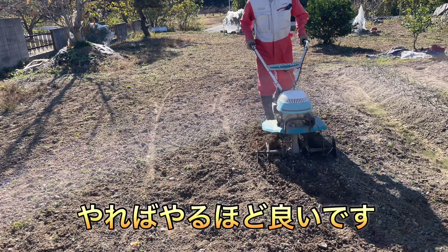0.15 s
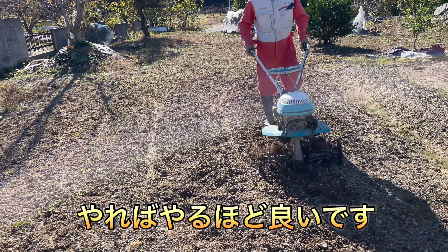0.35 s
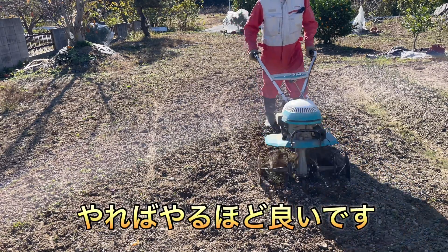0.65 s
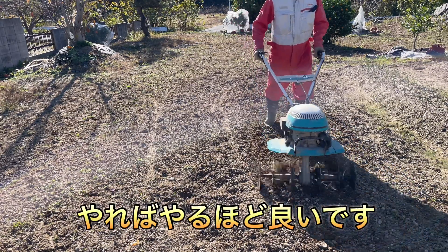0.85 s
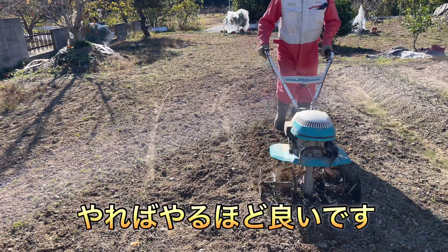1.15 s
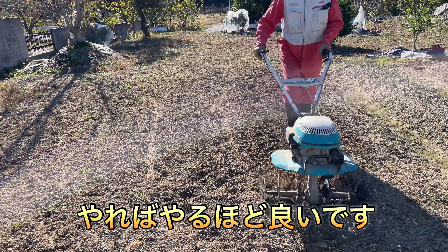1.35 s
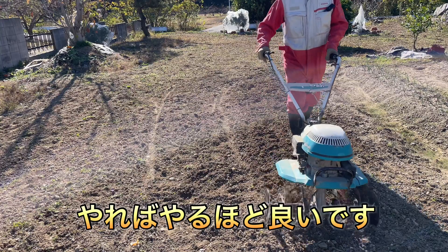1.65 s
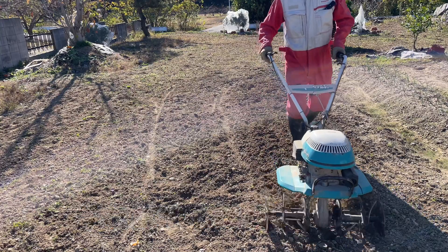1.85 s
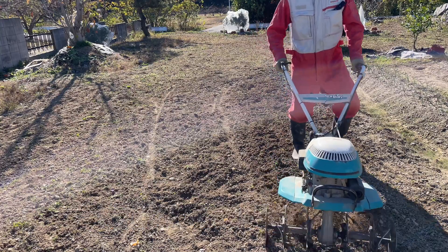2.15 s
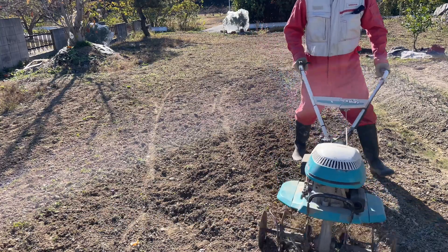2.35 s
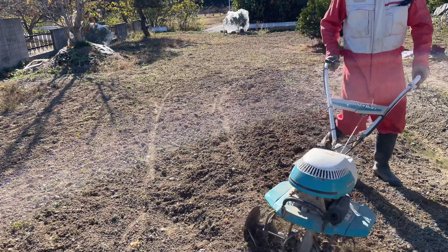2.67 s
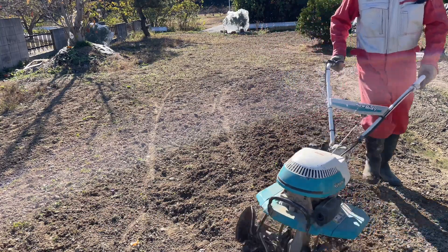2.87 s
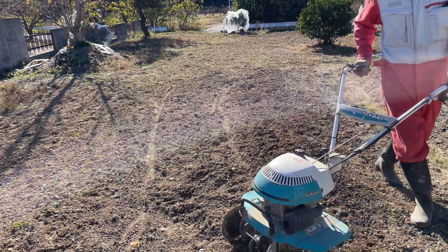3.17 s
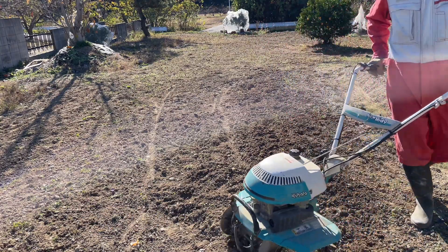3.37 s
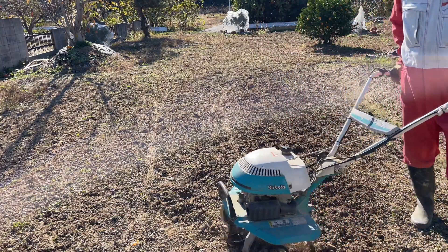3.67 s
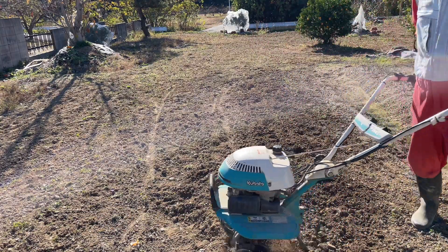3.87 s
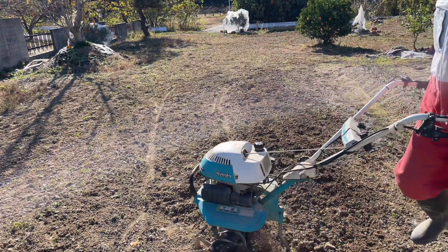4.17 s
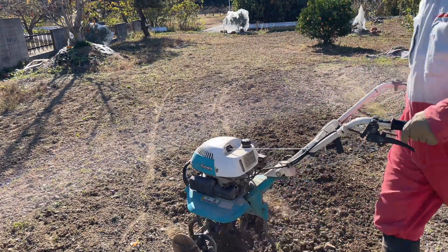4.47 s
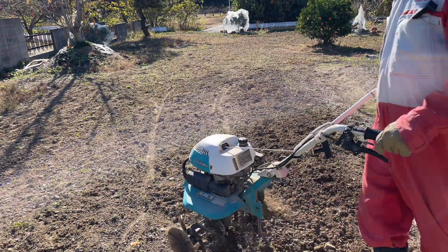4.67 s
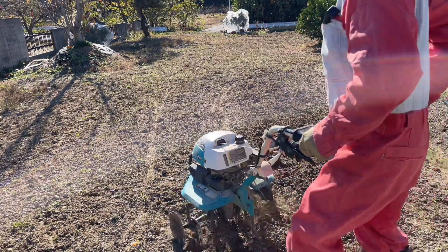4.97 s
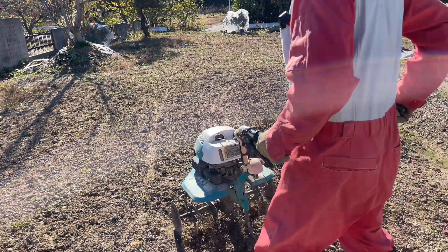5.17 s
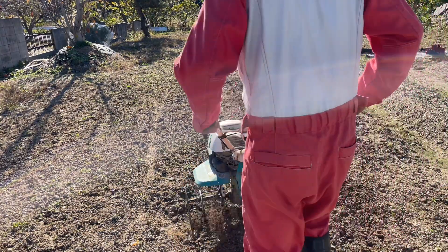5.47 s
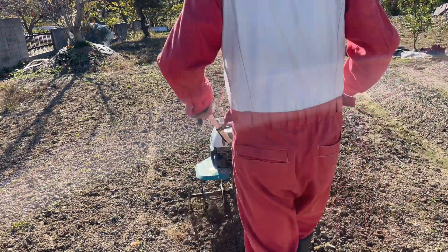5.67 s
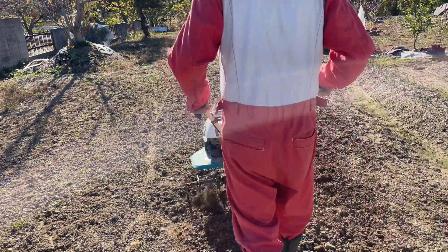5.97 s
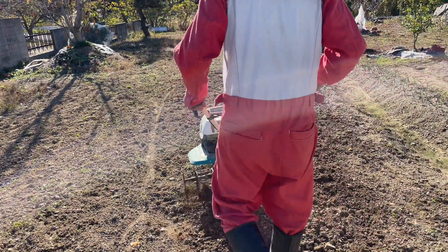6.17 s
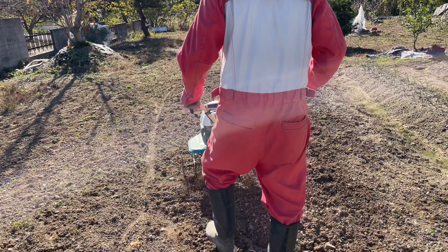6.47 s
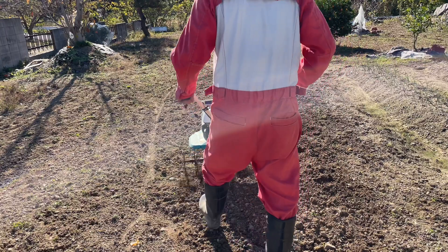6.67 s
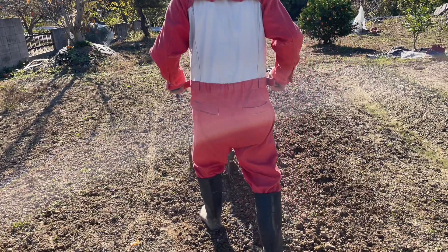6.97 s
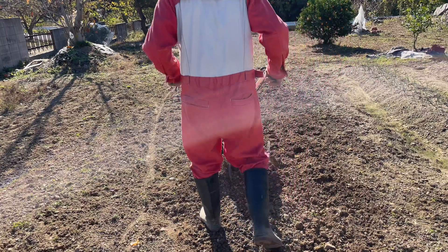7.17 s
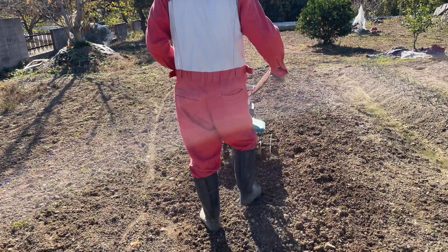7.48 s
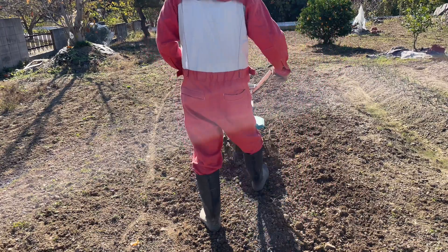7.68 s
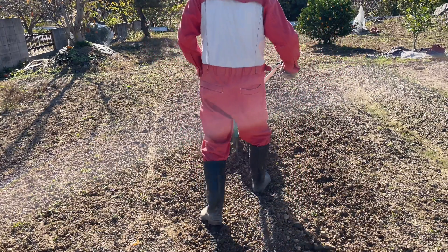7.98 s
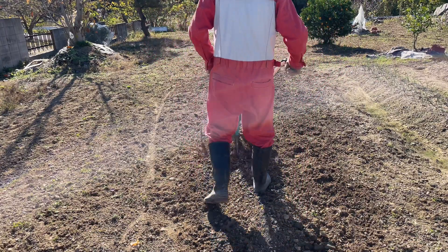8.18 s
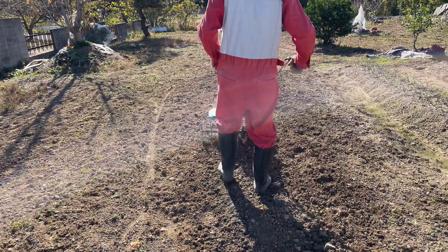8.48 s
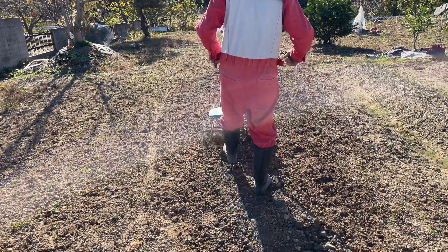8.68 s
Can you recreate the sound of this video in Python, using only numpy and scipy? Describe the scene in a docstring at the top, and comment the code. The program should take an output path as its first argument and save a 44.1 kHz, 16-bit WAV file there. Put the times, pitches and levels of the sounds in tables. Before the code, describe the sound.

Steady low putter of a small four-stroke tiller working dry soil close by, with metallic clatter, fan hiss and occasional stone clinks.

```python
"""A small four-stroke cultivator chugs steadily, tilling dry soil in an open field, under 3 m away.
It comes near, turns side on and moves off, its operator stepping between it and the two-port microphone.
Each cycle gives a muffled exhaust thump built of overtones, a cracking muffler, and a combustion knock;
noise driven by piston and valve blows rattles the covers and fins, and the cooling fan hisses.
Random grains make crumbling earth; narrow noise bands swell, stones clink, tines scrape harder ground."""
import sys
import numpy as np
from scipy import signal
from scipy.fft import rfft, irfft, next_fast_len
from scipy.io import wavfile

SR = 44100
rng = np.random.default_rng(int(sys.argv[2]) if len(sys.argv) > 2 else 0)


def inscribe(sig):
    """Save sig as 16-bit PCM at rate SR to the path in sys.argv[1].

    A 1-D sig is mono; a 2-D sig holds one channel per row.
    Samples are clipped to [-1, 1] before scaling.
    """
    pcm = np.round(np.clip(np.atleast_2d(sig).T, -1, 1) * 32767)
    wavfile.write(sys.argv[1], SR, pcm.astype(np.int16))


N = 389403
TIME = np.arange(N) / SR


def from_db(db):
    """Decibels to amplitude gain."""
    return np.exp(np.asarray(db) * (np.log(10) / 20))


def rms_one(x):
    """Scale to unit power."""
    return x / np.sqrt(np.mean(x ** 2) + 1e-20)


def in_time(rows):
    """Each column of a curve, interpolated at every sample."""
    seconds, *columns = np.transpose(rows)
    return [np.interp(TIME, seconds, column) for column in columns]


def at_hz(points, hz):
    """Read a spectrum on a log-frequency axis."""
    f, value = np.transpose(points)
    return np.interp(np.log(hz + 1), np.log(f), value)


def filtered(x, response):
    """Apply a response given as a function of frequency in Hz."""
    size = next_fast_len(N + 4096)
    hz = np.arange(size // 2 + 1) * SR / size
    return irfft(rfft(x, size) * response(hz), size)[..., :N]


def highpassed(x, corner_hz, order):
    """Remove the bass without shifting phase; half amplitude at the corner."""
    return filtered(x, lambda hz: hz ** order / (hz ** order + corner_hz ** order))


def colour(x, spectrum):
    """Shape a sound by a dB spectrum."""
    return filtered(x, lambda hz: from_db(at_hz(spectrum, hz)))


def drift(rate_hz):
    """Smooth chance with unit power, drawn at every 100th sample and slower than about rate_hz."""
    steps = np.arange(0, N + 100, 100)
    hz = np.arange(len(steps) // 2 + 1) * SR / steps[-1]
    spectrum = rfft(rng.standard_normal(len(steps))) / (1 + (hz / rate_hz) ** 4)
    slow = irfft(spectrum, len(steps))
    return np.interp(np.arange(N), steps, rms_one(slow))


def resonate(x, modes, flip=-1):
    """Parallel resonances; each is scaled by one more factor of flip, so -1 alternates their signs."""
    out = 0
    for k, (hz, width_hz, db) in enumerate(modes):
        r = np.exp(-np.pi * width_hz / SR)
        top = flip ** k * from_db(db) * (1 - r * r) / 2
        poles = [1, -2 * r * np.cos(2 * np.pi * hz / SR), r * r]
        out = out + signal.lfilter([top, 0, -top], poles, x + 1e-18)
    return out


def diffuse(x, decay_ms):
    """Smear a sound over a short random tail of decaying noise with unit energy."""
    ms = np.arange(SR // 5) * 1000 / SR
    tail = rng.standard_normal(len(ms)) * np.exp(-ms / decay_ms)
    return signal.fftconvolve(x, tail / np.linalg.norm(tail))[:N]


def once_a_cycle(cycle, at, spread_db, jitter_ms):
    """A click each time the engine passes one point of its cycle, never quite alike."""
    where = np.flatnonzero(np.diff(np.floor(cycle - at)) > 0)
    chance = rng.standard_normal((N // 1000, 2))[:len(where)]
    shift = (chance[:, 0] * jitter_ms * SR / 1000).astype(int)
    clicks = np.zeros(N)
    clicks[np.clip(where + shift, 0, N - 1)] = from_db(spread_db * chance[:, 1])
    return clicks


def grains(per_s, spread_db):
    """Random tiny contacts of very uneven size and either sign, at unit power."""
    sizes = from_db(spread_db * np.minimum(rng.exponential(1, N), 4))
    happens = rng.random(N) < per_s / SR
    return rms_one(happens * sizes * rng.choice([-1, 1], N))


def swell(middle_s, half_s, db):
    """A smooth rise and fall of gain."""
    near = abs(TIME - middle_s) < 4 * half_s
    gain = np.zeros(N)
    gain[near] = from_db(db) * np.exp(-((TIME[near] - middle_s) / half_s) ** 2)
    return gain


def facing(views, levels_db):
    """Gain of a part that radiates unevenly, as the machine turns from one view to the next."""
    return from_db(sum(share * db for share, db in zip(views, levels_db)))


# exhaust note from four sides, relative levels: (multiple of the firing rate, level [dB])
FRONT_NOTE = [(2, -5.5), (3, -8), (4, -2), (5, 0.5), (6, 1.5), (7, -5.5), (8, -10.5), (9, -11), (10, -19.5),
              (12, -24.5), (16, -21)]
SIDE_NOTE = [(2, -6), (3, -8), (4, -2.5), (5, 1.5), (6, 1.5), (7, -7), (8, -15), (9, -18.5), (10, -35),
             (11, -33), (12, -17), (13, -13.5)]
TURNING_NOTE = [(1, -40), (2, -3), (3, -8), (4, 3), (5, 2.5), (6, -1), (7, -6.5), (8, -6), (9, -14),
                (10, -20.5), (11, -22), (12, -27.5), (14, -13)]
BACK_NOTE = [(1, -37), (2, -4.5), (3, -9), (4, -0.5), (5, 0), (6, 3.5), (7, -11.5), (8, -11), (9, -11),
             (10, -19.5), (11, -15), (12, -17.5), (15, -17), (16, -19.5)]
# uneven gas flow around the note, relative spectrum: (frequency [Hz], level per Hz [dB])
GAS_FLOW = [(20, -1), (38, -15), (60, 3.5), (160, 1.5), (240, 3.5), (320, -12), (450, -10.5), (900, -33)]
# source level, before distance: (front [dB], side [dB], turning [dB], behind the operator [dB])
EXHAUST_LEVEL = [-6, -11, -14.5, -10.5]
CRANK_LEAD_RAD = .75


def exhaust(cycle, views):
    """One rounded thump per firing, its overtones set by the side that faces the microphone."""
    angle = (2 * np.pi * ((cycle + .002 * drift(8)) % 1)).astype("float32")
    thumps = 0
    for share, note in zip(views, (FRONT_NOTE, SIDE_NOTE, TURNING_NOTE, BACK_NOTE)):
        overtones = 0
        for multiple, db in note:
            k = round(multiple)
            # the crankshaft, turning twice a cycle, shakes the machine a little ahead of the thump
            phase = (k == 2) * CRANK_LEAD_RAD
            # above the muffler's main resonance the overtones swing a third of a turn out of step
            phase += (multiple > 7.5) * 2 * np.pi / 3
            overtones = overtones + float(from_db(db)) * np.cos(k * angle + phase)
        thumps = thumps + share * rms_one(overtones)
    flow = rms_one(colour(rng.standard_normal(N), GAS_FLOW))
    return facing(views, EXHAUST_LEVEL) * (from_db(0.25 * drift(6.6)) * thumps + from_db(-20) * flow)


# piston and valve blows: (delay after the thump [cycles], relative strength, decay [ms])
CYCLE_BLOWS = [(-.43, .35, 2.5), (-.265, 0.62, 2.4), (.0, 0.28, 3.2), (0.249, 0.76, 1.8)]


def shaking(cycle):
    """Piston and valve blows each set off a short, dying burst of force that drives the clatter."""
    force = 0
    for at, strength, decay_ms in CYCLE_BLOWS:
        clicks = once_a_cycle(cycle, at=at, spread_db=3.5, jitter_ms=0.27)
        decay = np.exp(-1000 / (decay_ms * SR))
        force = force + strength * signal.lfilter([1], [1, -decay], clicks + 1e-18)
    return force


def loose_parts(shake, modes, steady, swell_db):
    """Each part rattles by itself, harder after every blow, and flares and fades at random."""
    out = 0
    force = steady + shake
    for mode in modes:
        noise = rng.standard_normal(N) * force
        out = out + resonate(noise * from_db(swell_db * drift(14)), [mode])
    return rms_one(out)


def rattle(shake, behind, front_modes, back_modes, steady, swell_db):
    """As the machine turns, the parts at its back take over from those at its front."""
    front = loose_parts(shake, front_modes, steady, swell_db)
    back = loose_parts(shake, back_modes, steady, swell_db)
    return np.sqrt(np.clip(1 - behind, 0, 1)) * front + np.sqrt(behind) * back


# engine cover and tine guard, front then back: (frequency [Hz], width [Hz], relative level [dB])
COVER_FRONT = [(456, 110, -10.5), (570, 84, -7), (765, 204, -7), (939, 68, -13.5), (1256, 64, -3),
               (1318, 44, -0.5), (1424, 79, -6.5)]
COVER_BACK = [(351, 210, -8), (663, 126, -4), (800, 100, -5.5), (971, 74, -2), (1318, 53, 1.5),
              (1435, 67, -1)]
# source level, before distance: (front [dB], side [dB], turning [dB], behind the operator [dB])
COVER_LEVEL = [-17, -19.5, -22, -21.5]


def cover_rattle(shake, views):
    """Engine cover and tine guard ring on their modes as the blows shake them."""
    behind = views[2] + views[3]
    parts = rattle(shake, behind, COVER_FRONT, COVER_BACK, steady=0.95, swell_db=1.25)
    return facing(views, COVER_LEVEL) * parts


# cooling fins and linkage, front then back: (frequency [Hz], width [Hz], relative level [dB])
FINS_FRONT = [(1970, 113, 4), (2123, 63, 4.5), (2280, 67, 3.5), (2600, 260, -4.5), (3180, 470, -7),
              (5380, 480, -11), (6270, 1100, -12.5)]
FINS_BACK = [(1997, 71, 4.5), (2193, 106, 0.5), (2560, 140, -0.5), (3050, 87, -1), (3266, 200, -1.5),
             (6010, 250, -6)]
# source level, before distance: (front [dB], side [dB], turning [dB], behind the operator [dB])
FINS_LEVEL = [-21.5, -21.5, -23.5, -27]


def fins_rattle(shake, views):
    """Cooling fins and linkage rattle on higher modes than the cover."""
    behind = views[2] + views[3]
    parts = rattle(shake, behind, FINS_FRONT, FINS_BACK, steady=0.87, swell_db=2.0)
    return facing(views, FINS_LEVEL) * parts


# fan and gear hiss, relative spectrum: (frequency [Hz], level per Hz [dB])
HISS_SPECTRUM = [(250, -20), (480, -3), (1000, -3.5), (1700, -2), (2400, -1), (3600, -3.5), (5000, -5.5),
                 (7500, -6), (9500, -7), (12000, -12.5), (14000, -14.5), (16000, -32)]


def fan(shake, views):
    """Fan and gear hiss, stronger after each blow; a short random tail gives it a finely uneven colour."""
    hiss = rms_one(colour(rng.standard_normal(N) * (0.52 + shake), HISS_SPECTRUM))
    hiss = rms_one(hiss + 0.39 * diffuse(hiss, decay_ms=10.4))
    # from the front the cowl takes the edge off the hiss
    cowl = .5 * views[0] * resonate(hiss, [(6300, 1900, 0)])
    return from_db(0.87 * drift(15.0)) * (hiss - cowl)


# tine steel, rung by crumbs and by stones: (frequency [Hz], width [Hz], relative level [dB])
TINE_STEEL = [(3240, 360, 21), (4870, 560, 11), (7140, 700, 9), (10500, 6800, 4), (14500, 2500, -4)]


def crumbling():
    """Crumbs of earth patter in clumps and ring the steel: random grains whose density drifts."""
    crumbs = grains(per_s=1300 * from_db(3 * drift(6.4)), spread_db=5.0)
    return rms_one(resonate(crumbs, TINE_STEEL))


# hiss source level, before distance: (front [dB], side [dB], turning [dB], behind the operator [dB])
HISS_LEVEL = [-19.5, -19.5, -18, -20]
# highest treble, beamed forward: (front [dB], side [dB], turning [dB], behind the operator [dB])
TREBLE_BEAM = [0, -2.5, -3.5, -5.5]


def bright_air(shake, views):
    """Hiss and crumbs; the highest treble flutters a little and fades as the machine turns away."""
    bright = facing(views, HISS_LEVEL) * (fan(shake, views) + from_db(-19.0) * crumbling())
    treble = highpassed(bright, corner_hz=6000, order=4)
    treble_gain = facing(views, TREBLE_BEAM) * from_db(1.0 * drift(23))
    return bright + (treble_gain - 1) * treble


# muffler shell, front then back: (frequency [Hz], width [Hz], relative level [dB])
MUFFLER_FRONT = [(415, 60, -7.5), (541, 60, 5.5), (630, 107, 0.5), (780, 240, -9)]
MUFFLER_BACK = [(468, 36, 1), (607, 63, 2.5), (657, 62, -1.5), (979, 44, 4.5)]
# sharp front of each gas pulse leaving the tailpipe: (frequency [Hz], width [Hz], level [dB])
TAILPIPE_MODE = [(726, 640, 0)]
# shell, then crack, before bass cut and distance:
# (front [dB], side [dB], turning [dB], behind the operator [dB])
SHELL_LEVEL = [-27, -17, -26, -36.5]
CRACK_LEVEL = [-23, -32.5, -33, -29.5]


def bark(cycle, views):
    """A quarter cycle after the knock the exhaust valve opens: tailpipe cracks, muffler shell rings."""
    puffs = once_a_cycle(cycle, at=0.0023, spread_db=0.3, jitter_ms=0.062)
    behind = views[2] + views[3]
    front = rms_one(resonate(puffs, MUFFLER_FRONT))
    back = rms_one(resonate(puffs, MUFFLER_BACK))
    shell = (1 - behind) * front + behind * back
    crack = rms_one(resonate(resonate(puffs, TAILPIPE_MODE), TAILPIPE_MODE))
    return facing(views, SHELL_LEVEL) * shell + facing(views, CRACK_LEVEL) * crack


# firings that hit harder: (time [s], extra strength [dB])
HARDER_FIRINGS = [(2.705, 3), (2.772, 4), (3.035, 3), (3.133, 3), (3.431, 3.5), (3.789, 3), (3.855, 4),
                  (3.888, 4), (4.021, 3), (4.122, 4), (4.156, 3.5), (4.356, 3.5), (7.358, 4)]
# band of the crankcase jolt: (low edge [Hz], high edge [Hz])
JOLT_BAND = [585, 1000]
# sharp edge of the knock in the crankcase: (frequency [Hz], width [Hz], relative level [dB])
CRANKCASE = [(1480, 390, 1.5), (2400, 1100, -6), (4530, 2700, -15)]
# jolt, then edge, before bass cut and distance:
# (front [dB], side [dB], turning [dB], behind the operator [dB])
JOLT_LEVEL = [-25, -20.5, -25, -26.5]
EDGE_LEVEL = [-40, -27.5, -37.5, -39]


def knock(cycle, views):
    """Combustion jolts the crankcase for two or three swings; harder firings have a sharper edge."""
    extra_db = np.zeros(N)
    for s, db in HARDER_FIRINGS:
        extra_db[int((s - .015) * SR):int((s + .015) * SR)] = db
    clicks = once_a_cycle(cycle, at=-.258, spread_db=0.94, jitter_ms=.055) * from_db(extra_db)
    band = signal.butter(3, JOLT_BAND, "band", fs=SR, output="sos")
    jolt = -rms_one(signal.sosfilt(band, clicks + 1e-18))
    # the power makes the edge grow faster than the firing
    edge = rms_one(resonate(clicks ** 1.8, CRANKCASE, flip=0.84))
    return facing(views, JOLT_LEVEL) * jolt + facing(views, EDGE_LEVEL) * edge


# spells when a narrow band of noise swells, low or high:
# (middle time [s], half length [s], frequency [Hz], level before spreading [dB])
BAND_SPELLS = [(2.1, 0.49, 558, -30.5), (1.74, 0.66, 1332, -29.5), (1.8, 0.37, 1983, -34.5),
               (2.923, 0.3, 2093, -31), (3.14, .22, 1318, -32), (3.555, 0.2, 1413, -32),
               (4.1, 0.52, 540, -32), (5.134, 0.3, 1400, -39), (6.25, 0.16, 350, -36),
               (7.345, 0.34, 1297, -36), (7.7, 0.43, 1995, -41.5)]
BAND_WIDTH_HZ = 43  # of each of the two resonances in a row


def swelling_bands():
    """Noise through two equal narrow resonances in a row wavers at one pitch, rising and fading."""
    out = 0
    noise = rng.standard_normal(N)
    for middle_s, half_s, hz, db in BAND_SPELLS:
        mode = [(hz, BAND_WIDTH_HZ, 0)]
        band = rms_one(resonate(resonate(noise, mode), mode))
        out = out + swell(middle_s, half_s, db) * band
    return out


# stones flicked against the tines: (time [s], strength before the steel rings [dB])
STONE_HITS = [(2.9028, -35), (5.026, -27), (5.657, -26)]


def stone_clinks():
    """Each stone scrapes for a moment and rings the tine steel."""
    stones = np.zeros(N)
    for s, db in STONE_HITS:
        stones[int(s * SR)] = from_db(db)
    scrape = rng.standard_normal(300) * np.exp(-np.arange(300) / 60)
    return resonate(signal.fftconvolve(stones, scrape)[:N], TINE_STEEL)


# tines dragging through harder ground:
# (middle time [s], half length [s], frequency [Hz], level before spreading [dB])
HARD_GROUND = [(4.263, 0.032, 2450, -26.5), (4.498, 0.17, 4700, -37), (4.726, 0.033, 2340, -31),
               (5.033, 0.07, 1940, -32), (5.236, 0.046, 2540, -29.5), (8.686, .03, 1510, -30),
               (8.817, 0.021, 1680, -31)]
SCRAPE_WIDTH_HZ = 430


def scraping():
    """Grit grinds along the tines in short, rough surges, each on one broad resonance."""
    out = 0
    grit = grains(per_s=1500, spread_db=5.0)
    for middle_s, half_s, hz, db in HARD_GROUND:
        grind = rms_one(resonate(grit, [(hz, SCRAPE_WIDTH_HZ, 0)]))
        out = out + swell(middle_s, half_s, db) * grind
    return out


# operator stepping between machine and microphone: (time [s], share of the machine covered)
OPERATOR_COVER = [(5.0, 0.076), (5.6, 0.65), (5.9, 0.89), (6.3, 0.54), (7.2, 1), (8, 0.86), (8.83, 0.63)]
SHADOW_DB, SHADOW_HZ = -5, 1130  # change of the shorter waves when fully covered


def shadowed(x):
    """Low notes bend round the operator; the rest is weakened while he stands in the way."""
    covered, = in_time(OPERATOR_COVER)
    short_waves = highpassed(x, SHADOW_HZ, order=6)
    return x + (from_db(SHADOW_DB * covered) - 1) * short_waves


# diffuse tail that differs left and right, relative to the direct sound: (frequency [Hz], level [dB])
TAIL_SPECTRUM = [(60, -20), (170, -18.5), (350, -10.5), (1000, -12.5), (2500, -10), (5000, -5.5),
                 (7000, -6), (8500, -40)]


def diffuse_tail(direct):
    """A diffuse tail spreads the sound between left and right, least in the highest treble."""
    return colour(diffuse(direct, decay_ms=35.0), TAIL_SPECTRUM)


# engine speed, sagging as the tines bite and caught by the governor: (time [s], firing rate [per s])
ENGINE_SPEED = [(0.0, 30.13), (0.48, 30.84), (0.6, 30.03), (0.69, 30.48), (1.29, 29.53), (1.59, 31.23),
                (2.01, 29.65), (2.21, 30.8), (2.3, 30.21), (3.05, 30.44), (3.2, 30.11), (3.56, 30.75),
                (3.89, 30.47), (4.1, 29.55), (4.55, 30.57), (5.12, 29.77), (5.27, 30.6), (5.45, 29.59),
                (5.57, 30.66), (5.81, 29.87), (5.9, 30.73), (6.32, 31.25), (6.56, 30.17), (6.88, 30.6),
                (7.06, 29.51), (7.51, 30.25), (7.63, 31.16), (7.72, 30.38), (7.84, 31.06), (8.23, 29.62),
                (8.38, 30.34), (8.47, 29.37), (8.65, 30.74), (8.83, 29.19)]
# (time [s], view: 0 coming near, 1 side on, 2 turning away, 3 hidden behind the operator)
MACHINE_HEADING = [(0, 0), (1.5, 0), (2.3, 0.33), (2.9, 1.05), (3.7, 1.25), (4.3, 1.52), (5, 2), (5.7, 2.5),
                   (6.1, 2.5), (7, 3)]
# the machine comes near and moves off: (time [s], distance from the microphone [m])
MACHINE_DISTANCE = [(0, 2.74), (1.7, 2.25), (3, 1.87), (4.2, 2.18), (5.6, 2.7), (8.83, 2.78)]
# pitches at which the casing radiates poorly: (frequency [Hz], width [Hz], cancelled part [dB])
CASING_NULLS = [(1135, 97, -15.5), (1680, 91, -11.5)]
FIRST_THUMP_S = .0083


def scene():
    """The machine on open ground, its level falling with distance, spread a little between the sides."""
    speed, = in_time(ENGINE_SPEED)
    heading, = in_time(MACHINE_HEADING)
    distance, = in_time(MACHINE_DISTANCE)
    cycle = np.cumsum(speed) / SR - FIRST_THUMP_S * speed[0]
    views = [np.maximum(0, 1 - abs(np.clip(heading, 0, 3) - k)) for k in range(4)]
    front, side_on, turning, hidden = views
    # the valve gear is at the front: its blows weaken as the machine turns away
    shake = shaking(cycle) * (1 - 0.34 * turning - 0.66 * hidden)
    # the small metal shells radiate no bass: that comes from the tailpipe alone
    blows = highpassed(bark(cycle, views) + knock(cycle, views), corner_hz=400, order=12)
    engine = exhaust(cycle, views) + blows
    rattles = cover_rattle(shake, views) + fins_rattle(shake, views)
    machine = engine + rattles + bright_air(shake, views)
    radiated = machine - resonate(machine, CASING_NULLS, flip=0.9)
    direct = shadowed(radiated) / distance
    direct = direct + swelling_bands() + stone_clinks() + scraping()
    tail = diffuse_tail(direct)
    # the balance leans from right to left as the heading goes on
    lean = from_db(.15 * (heading - 1.5))
    # the tail has opposite sign on the two sides
    return np.array([(direct + tail) * lean, (direct - tail) / lean])


# the two microphone ports: (frequency [Hz], left lead [rad])
PHASE_BETWEEN_PORTS = [(20, 0), (5800, 0), (6720, -1.0), (8050, -3.14), (11700, -6.28), (14500, -9.2),
                       (16000, -9.6)]
# (frequency [Hz], left minus right [dB])
BALANCE_OF_PORTS = [(60, 1), (200, -2), (1300, -1.1), (2300, 0.5), (3500, 2), (5300, 4), (6800, 1),
                    (8000, 4)]
CEILING, CUTOFF_HZ = .92, 15550  # ceiling in full-scale amplitude, before the top is cut


def record(dry):
    """The microphone's two ports differ in level and treble phase; peaks are rounded, the top is cut."""
    sides = np.array([[.5], [-.5]])

    def port_response(hz):
        gain = from_db(sides * at_hz(BALANCE_OF_PORTS, hz))
        phase = sides * np.interp(hz, *np.transpose(PHASE_BETWEEN_PORTS))
        return gain * np.exp(1j * phase)

    ports = filtered(dry, port_response)
    rounded = ports / (1 + (ports / CEILING) ** 10) ** (1 / 10)
    top_cut = signal.ellip(10, .1, 80, CUTOFF_HZ, fs=SR, output="sos")
    return signal.sosfilt(top_cut, rounded)


dry = scene()
out = record(dry)
inscribe(out)
```